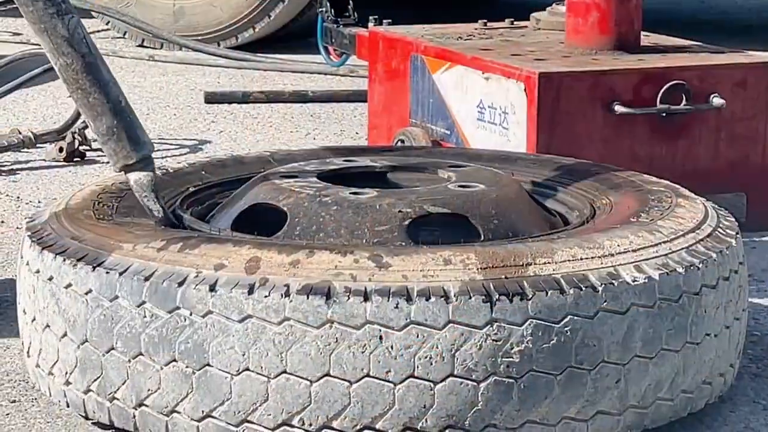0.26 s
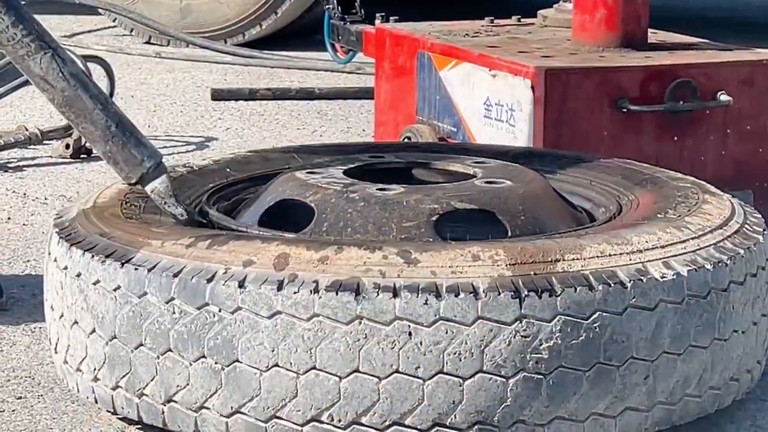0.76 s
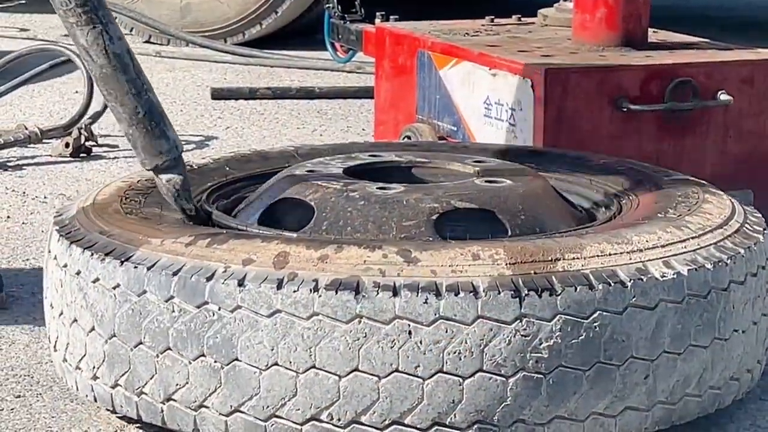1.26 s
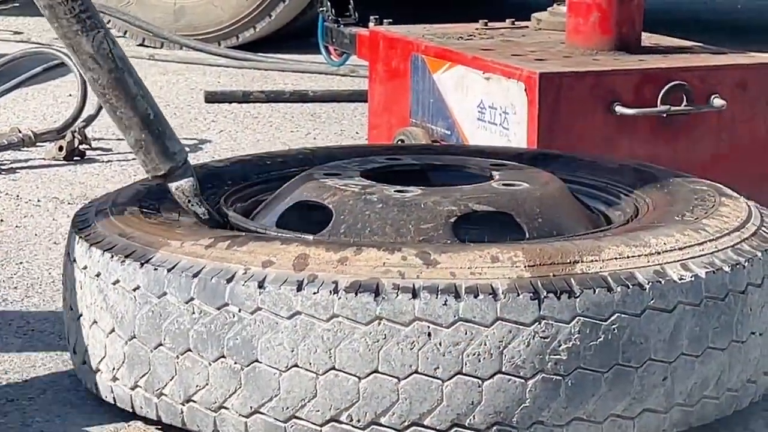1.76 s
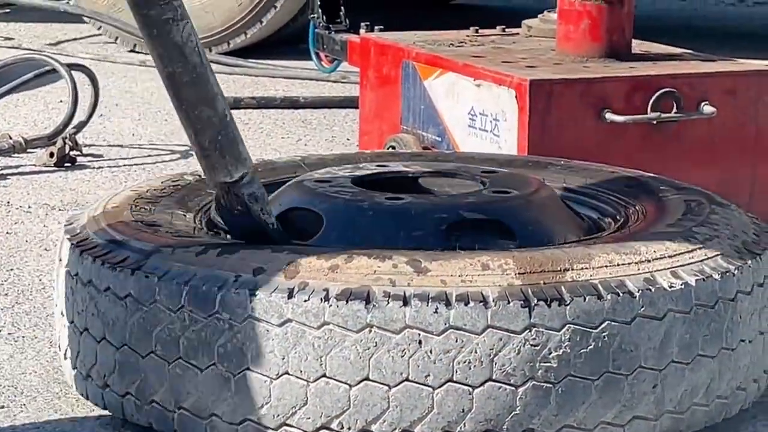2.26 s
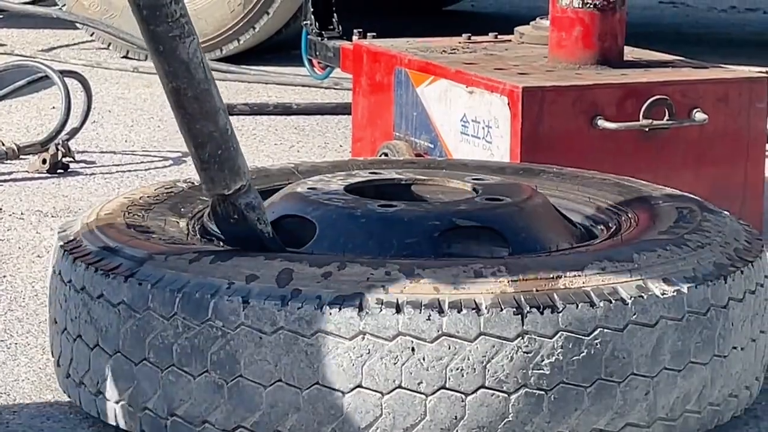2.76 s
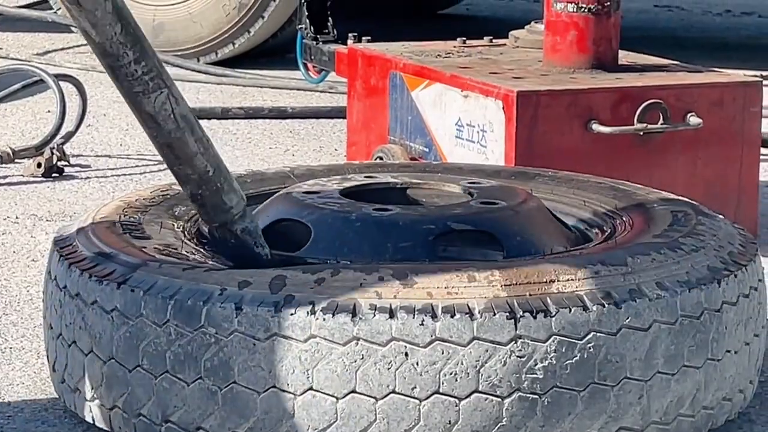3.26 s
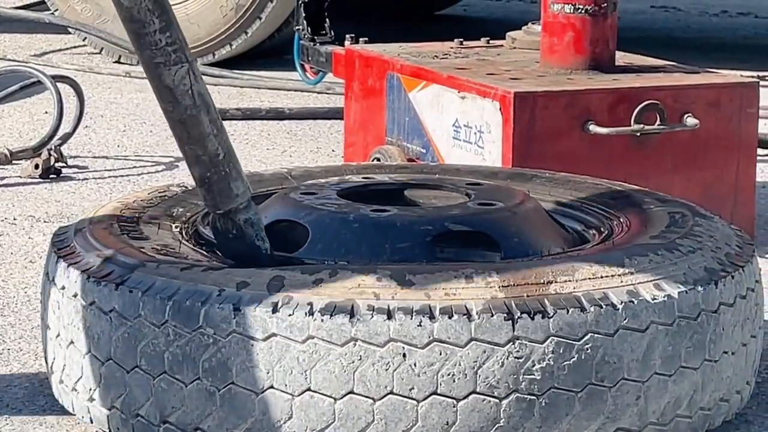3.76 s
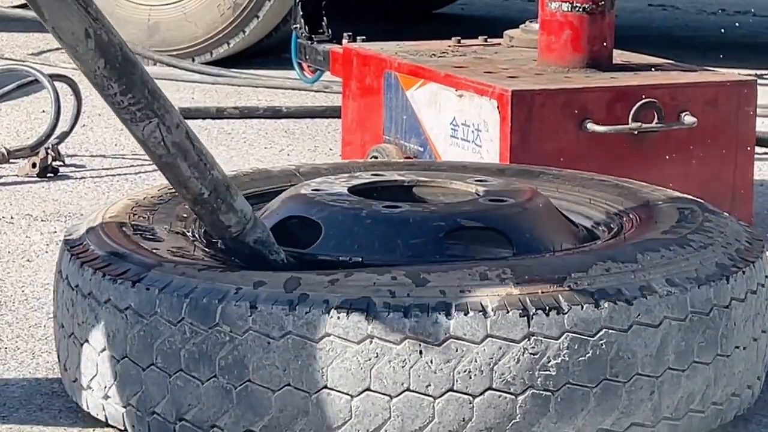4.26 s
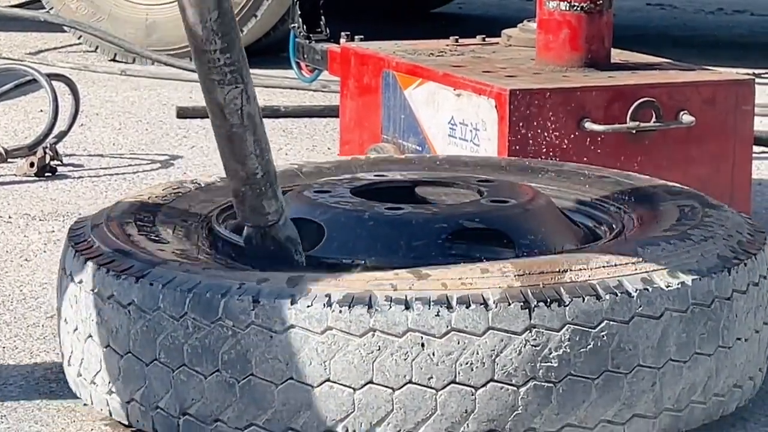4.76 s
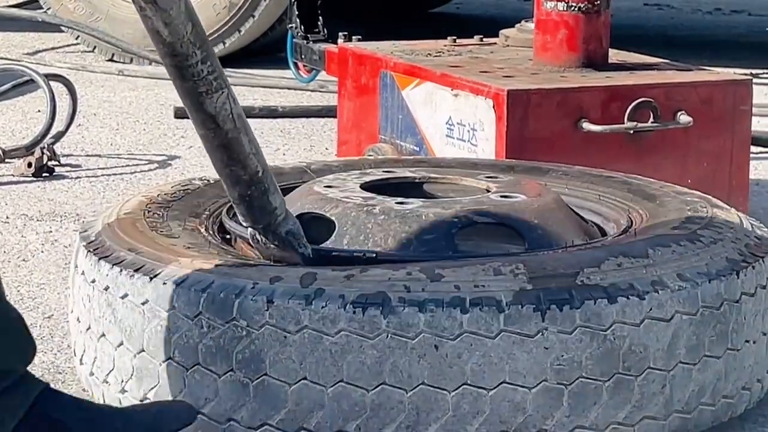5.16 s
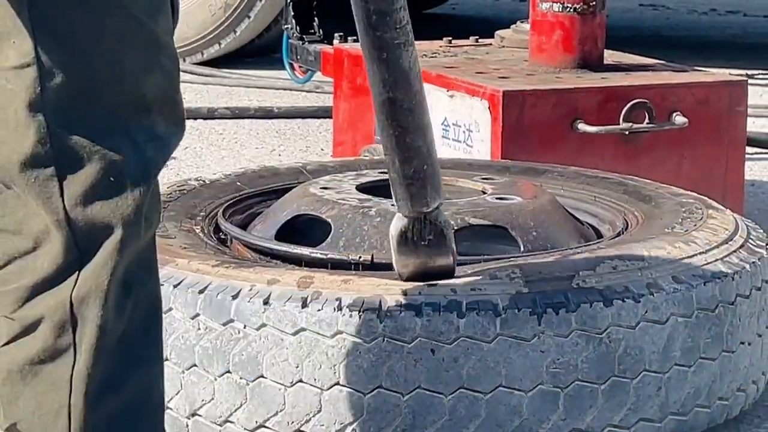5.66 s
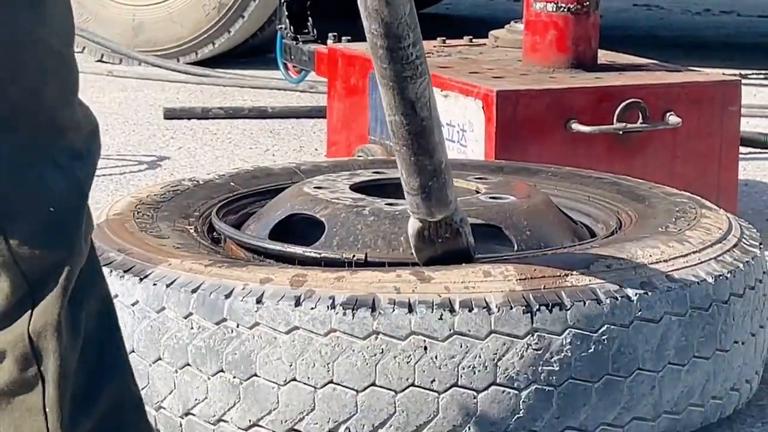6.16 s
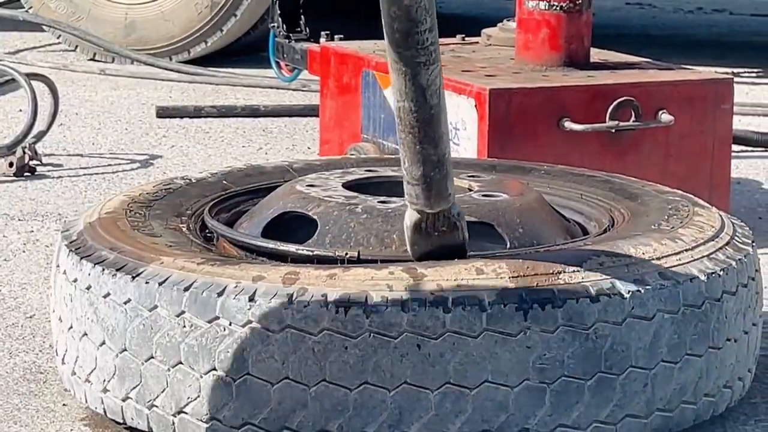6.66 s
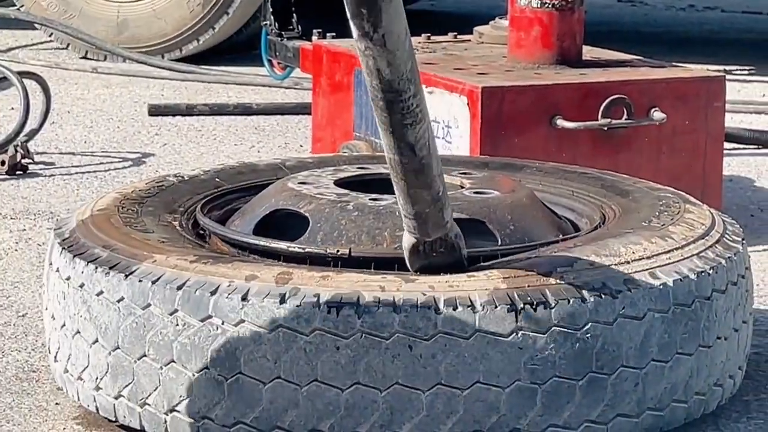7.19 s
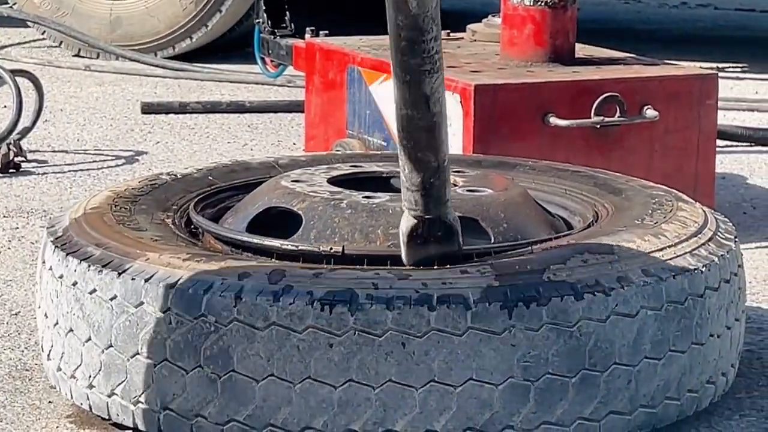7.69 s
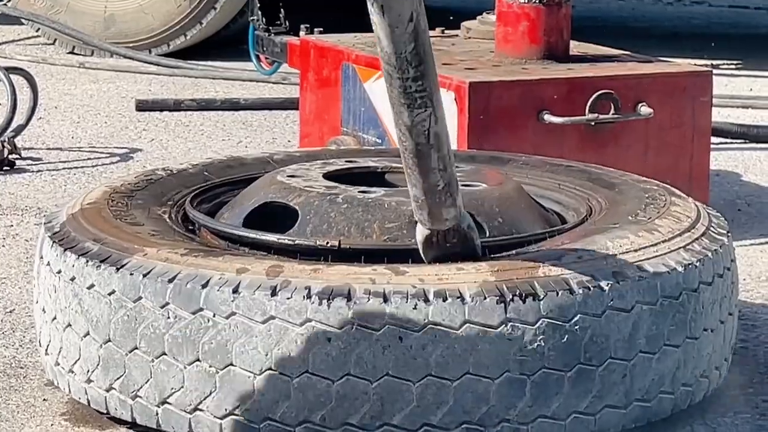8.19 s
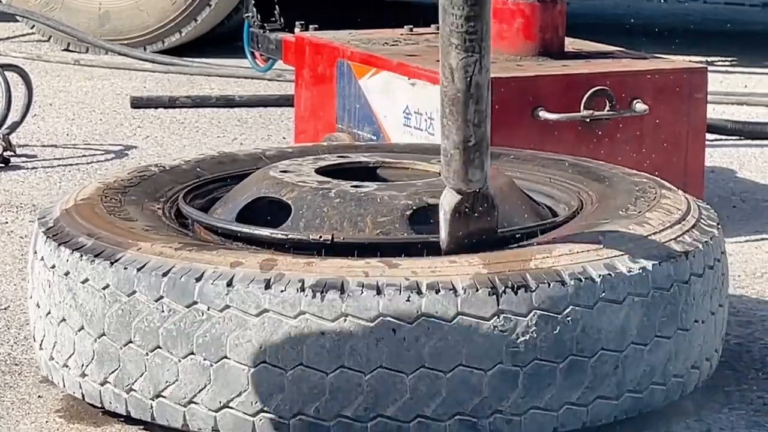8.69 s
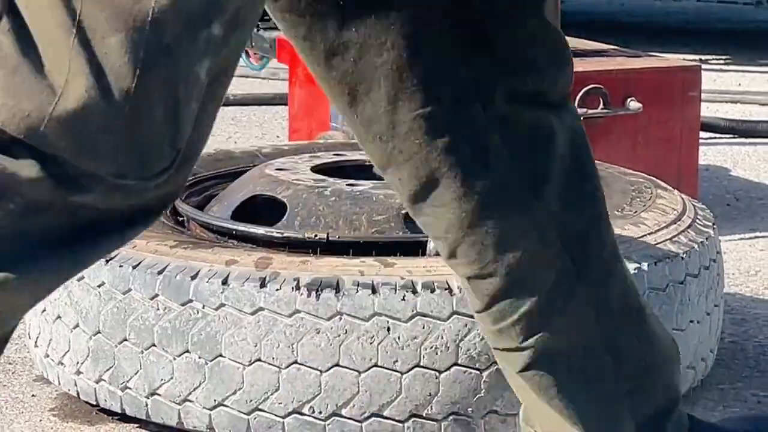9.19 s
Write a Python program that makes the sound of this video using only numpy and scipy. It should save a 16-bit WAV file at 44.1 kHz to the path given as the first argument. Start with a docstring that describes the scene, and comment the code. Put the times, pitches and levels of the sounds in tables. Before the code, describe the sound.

Wind puffs and steel rattling open the scene, then a slow series of slams follows about every second, steel on steel with a dull tyre thump underneath. Between blows the sleeve scrapes along the bar, ticking, with one short breathy rising squeak late on. Dry, open yard, close phone microphone, narrow stereo, faint hiss; a quieter blow comes midway.

```python
"""An open lot, close to a lorry wheel: a steel sleeve slides on a long bar wedged between tyre and rim.
It scrapes, rattles and slams down: shaped noise, directly and through damped modes of the steel.
Bar and wheel disc sing after single ticks; the tyre thuds from short pushes and a falling rim note.
Wind on the phone's two microphone ports is band noise, random pops and single puffs; the rising
sleeve squeaks with gliding partials, and a faint hiss lies behind it all."""
import sys
import numpy as np
from scipy import signal
from scipy.fft import rfft, irfft
from scipy.io import wavfile
from scipy.ndimage import uniform_filter1d

SR = 44100
rng = np.random.default_rng(int(sys.argv[2]) if len(sys.argv) > 2 else 0)


def waveform_to_disk(signal):
    """Save audio, clipped to [-1, 1], as 16-bit WAV at the path in sys.argv[1]."""
    frames = np.transpose(np.atleast_2d(signal))
    scaled = np.clip(frames, -1, 1) * 32767
    samples = np.round(scaled).astype(np.int16)
    wavfile.write(sys.argv[1], SR, samples)


N = 415863

# Full blows of the sleeve, driving the bar into the tyre bead. Each row: start in seconds, blow level in dB,
# tyre air in dB over the blow, settled note of the rim seat in Hz, rub level of the rebound in dB.
BLOWS = [(0.391, -20, 15.5, 290, -46.5), (1.222, -11, 5, 332, -36.5), (2.852, -11, -14, 595, -49),
         (3.859, -9, 3, 339, -38.5), (4.7, -5.5, 1.5, 356.4, -32), (5.966, -17.5, -10, 813, -59),
         (6.687, -24.5, 9, 300, -47.5), (6.822, -5, -1, 330, -42), (7.686, -23.5, -0.5, 1014, -44),
         (7.713, -10, 2, 337, -36.5), (8.552, -7.5, -3, 481, -35)]
# Ringing notes of the long bar. Each row: pitch in Hz, relative drive in dB, 60 dB decay time in seconds.
BAR_MODES = [(2992, 0, .45), (5495, 0, .25), (8190, 0, .45)]


def undb(db):
    """Amplitude factor of a level in dB."""
    return 10 ** (np.asarray(db) / 20)


def unit(x):
    """The signal scaled to an RMS of 1."""
    return x / np.sqrt(np.mean(x ** 2))


def curve(table):
    """Columns of a table in seconds, joined by straight lines over the whole scene."""
    s, *columns = np.transpose(table)
    return [np.interp(np.arange(N) / SR, s, column) for column in columns]


def on_hz(table):
    """A (Hz, value) table read at every FFT bin, on a logarithmic pitch scale."""
    hz, value = np.transpose(table)
    bins_hz = np.fft.rfftfreq(N + 1, 1 / SR)
    return np.interp(np.log(bins_hz + 1), np.log(hz), value)


def colour(x, gain):
    """Filter by a gain, real or complex, for every FFT bin."""
    return irfft(rfft(x, N + 1) * gain, N + 1)[..., :N]


def band(x, lo_hz, hi_hz, order=2):
    """Keep the band between two pitches."""
    edges_hz = [lo_hz, min(hi_hz, .45 * SR)]
    return signal.sosfilt(signal.butter(order, edges_hz, "band", fs=SR, output="sos"), x)


def walk(rate):
    """Random drift in straight lines between levels 1 / rate seconds apart; spread about 0.8."""
    k = int(SR / rate)
    levels = rng.standard_normal(N // k + 1)
    return 0.98 * uniform_filter1d(np.repeat(levels, k), k)[:N]


def add(track, s, shape):
    """Lay a short shape into a track at s seconds."""
    i = int(s * SR)
    track[i:i + len(shape)] += shape[:N - i]


def ring(force, modes, wander_db=0):
    """Damped modes; as the contact point moves, each mode is driven more or less."""
    out = 0
    for hz, db, t60 in modes:
        radius = np.exp(-np.log(1000) / (max(t60, .01) * SR))
        w = 2 * np.pi * hz / SR
        drive = force * undb(db + wander_db * walk(9))
        out = out + signal.lfilter([np.sin(w)], [1, -2 * radius * np.cos(w), radius ** 2], drive)
    return out


def grit(rate, spread_db):
    """Noise in uneven grains: a contact that chatters."""
    return unit(rng.standard_normal(N) * undb(spread_db * walk(rate)))


def lot():
    """Faint steady hiss of the open yard."""
    return undb(-73.5) * unit(band(rng.standard_normal(N), 300, 2700, order=1))


def pops():
    """Sharp eddies at random moments, a few much stronger, their level drifting in loose clusters."""
    pops_per_s, spread_db = 500, 3.2
    when, size, sign = rng.random((int(pops_per_s * N / SR), 3)).T
    out = np.zeros(N)
    out[(when * N).astype(int)] = np.sign(sign - .5) * undb(-spread_db * np.log(1 - size))
    return out * undb(2 * walk(13))


def wind():
    """Eddies at the ports: a lumpy rumble, and a flutter of short pops that reaches higher as it strengthens."""
    # Strength of the wind. Each row: time in seconds, rumble in dB, flutter in dB.
    gusts = [(0, -37.5, -25.5), (.3, -30, -27), (.44, -36.5, -37.5), (.74, -43, -31), (1.0, -51, -52),
             (1.4, -41, -50), (2.1, -49, -46.5), (2.4, -46, -38), (2.7, -43.5, -38.5), (2.9, -47.5, -49.5),
             (3.5, -48.5, -49.5), (3.86, -47, -55), (4.05, -41, -55.5), (4.78, -39, -49), (5.2, -40, -61),
             (5.45, -54.5, -64.5), (5.83, -47.5, -58), (6.1, -56, -63.5), (6.46, -43.5, -47.5),
             (7.14, -42, -54.5), (7.7, -41.5, -41), (8.3, -48, -60), (8.5, -37.5, -44), (8.85, -40.5, -52),
             (9.03, -49, -82), (9.25, -38.5, -67.5)]
    rumble_db, flutter_db = curve(gusts)
    rumble = 0
    # low edge Hz, high edge Hz, level dB, lumps per second
    for lo_hz, hi_hz, db, rate in [(45, 93.6, -1.5, 16), (82, 187, -3.5, 12), (160, 286, -8.5, 55)]:
        noise = unit(band(rng.standard_normal(N), lo_hz, hi_hz))
        rumble = rumble + undb(db + 4.5 * walk(rate)) * noise
    eddies = pops()
    low = unit(band(eddies, 150, 800, order=3))
    high = unit(band(eddies, 650, 1000, order=3))
    reach = undb(np.clip(0.8 * (flutter_db + 20.5), -18, 0))
    return undb(rumble_db) * rumble + undb(flutter_db) * (low + reach * high)


def puffs():
    """Each puff on the ports is a quick swell of lumpy noise around its own pitch."""
    # Single puffs. Each row: start in seconds, relative level in dB, centre in Hz.
    puff_rows = [(0.064, -17, 158), (0.115, -10, 760), (0.18, -20, 880), (0.209, -13.5, 890),
                 (0.27, -14.5, 750), (0.607, -16.5, 172), (0.705, -12.5, 198), (0.791, -29, 940),
                 (0.915, -22.5, 754), (1.622, -25, 200), (1.671, -21, 259), (1.75, -34.5, 600),
                 (2.026, -22.5, 218), (2.404, -15.5, 174), (2.602, -25, 215), (2.668, -19, 610),
                 (2.707, -21, 650), (3.116, -30, 408), (3.25, -33.5, 284), (3.345, -27, 183),
                 (5.324, -21, 208), (5.708, -25, 161), (6.486, -21.5, 153), (7.242, -24.5, 148),
                 (7.336, -16.5, 146), (7.395, -18, 164), (7.522, -16, 165), (8.422, -17.5, 237),
                 (8.444, -29, 397), (9.269, -17.5, 193.5)]
    out = np.zeros(N)
    t = np.arange(SR // 10) / SR
    swell = t / 0.0062 * np.exp(1 - t / 0.0072)
    noise = rng.standard_normal((len(puff_rows), len(t)))
    for (s, db, hz), air in zip(puff_rows, noise):
        lumps = unit(band(air, .45 * hz, 1.6 * hz, order=3))
        add(out, s, undb(db - 12.0) * swell * lumps)
    return out


def squeak():
    """A breathy note that rises as the air column in the lifting sleeve shortens."""
    # Glide of the note. Each row: time in seconds, pitch in Hz, level in dB before the partials' own levels.
    glide = [(7.09, 683, -51), (7.196, 727, -49), (7.3, 888, -50)]
    hz, db = curve(glide)
    t = np.arange(N) / SR
    on = np.clip(np.minimum(t - glide[0][0], glide[-1][0] - t) / 0.0067, 0, 1)
    turns = np.cumsum(hz) / SR
    notes = 0
    # pitch ratio, relative dB; a fast random drift makes each partial breathy
    for ratio, share_db in [(1, 3), (1.45, 0), (1.75, 2), (2.2, -4)]:
        notes = notes + undb(share_db) * walk(90) * np.sin(2 * np.pi * ratio * turns)
    return on * undb(db) * notes


def tyre():
    """A short push shakes the carcass and the rim seat at once; the air inside builds up its note a little later."""
    # Modes of the carcass. Each row: pitch in Hz, relative drive in dB, 60 dB decay time in seconds.
    carcass = [(80, -11.5, 0.24), (367.3, -5, 0.05), (500, 0, 0.018), (680, -6.5, 0.052), (965, -9.5, 0.15)]
    # Modes of the air in the tyre. Each row: pitch in Hz, relative drive in dB, 60 dB decay time in seconds.
    tyre_air = [(180, -7, 0.1), (230, -2, .12), (274, -2, 0.019)]
    air_lag_s = .013
    push, squeeze, seat = np.zeros((3, N))
    t = np.arange(SR // 20) / SR
    for s, db, air_db, hz, _ in BLOWS:
        add(push, s, undb(db) * unit(np.hanning(int(0.00092 * SR))))
        add(squeeze, s + air_lag_s, undb(db + air_db) * np.hanning(int(0.0019 * SR)))
        # the note drops as the stretched bead slackens
        turns = hz * (t + .003 * (1 - np.exp(-t / .004)))
        add(seat, s, undb(db - 60 * t / 0.12) * np.sin(2 * np.pi * turns))
    thud = undb(-34.5) * ring(push, carcass)
    air = undb(-34.5) * ring(squeeze, tyre_air)
    return thud + air + undb(-7.5) * seat


def singing():
    """Thin notes of the free bar and of the thick wheel disc, each set off by one tick."""
    # The bar swings free and sings. Each row: start in seconds, then drive in dB of its lowest, second
    # and third note.
    free_bar = [(.0094, -41.5, -48, -52.5), (0.421, -34, -42, -31), (0.7764, -44, -66, -48),
                (1.1278, -29, -61, -47), (1.2407, -23, -36, -31), (1.3194, -52, -38, -46),
                (2.219, -47.5, -54, -51.5), (2.991, -33, -33, -45.5), (3.7958, -29.5, -40, -53),
                (4.723, -26, -33, -29.5), (4.9495, -36.5, -49, -63), (6.9614, -39.5, -45, -44.5),
                (7.7295, -26.5, -41, -34.5), (7.85, -41.5, -62, -38), (8.5561, -28, -29, -26),
                (8.79, -38, -62, -45.5)]
    # Light touches that set the wheel disc singing. Each row: start in seconds, drive in dB.
    touches = [(0.0094, -42), (0.7715, -45.5), (1.049, -52.5), (7.236, -50.5), (7.3256, -36),
               (8.075, -56.5), (8.209, -59)]
    # Notes of the disc. Each row: pitch in Hz, relative drive in dB, 60 dB decay time in seconds.
    disc = [(2460, 0, .5), (4400, -7, .4)]
    bar_ticks = np.zeros((len(BAR_MODES), N))
    disc_ticks = np.zeros(N)
    for s, *notes_db in free_bar:
        for track, db in zip(bar_ticks, notes_db):
            add(track, s, undb([db]))
    for s, db in touches:
        add(disc_ticks, s, undb([db]))
    bar = sum(ring(track, [mode]) for track, mode in zip(bar_ticks, BAR_MODES))
    return bar + ring(disc_ticks, disc)


def slide_db():
    """The slow drag of the hands, and after every slam a rebound that swells, holds and dies."""
    # Sleeve rubbing on the bar. Each row: time in seconds, rub level in dB.
    drag = [(0, -36.5), (.12, -65), (.3, -51), (.85, -52), (1.1, -60.5), (1.7, -73.5), (2.38, -67),
            (2.56, -52.5), (2.7, -69.5), (2.82, -51.5), (3.4, -54.5), (3.65, -62), (4.15, -49.5),
            (4.49, -59), (4.62, -37.5), (5.0, -61), (5.36, -81), (5.75, -61.5), (6.05, -75), (6.4, -54),
            (6.66, -63), (6.81, -32), (7.1, -49), (7.5, -55.5), (8.0, -49), (8.4, -72), (8.75, -49),
            (9.0, -70), (9.43, -91)]
    rise_s, hold_s, fall_db_per_s = 0.03, 0.037, 115.5
    t = np.arange(N) / SR
    power = undb(2 * curve(drag)[0])
    for s, *_, rebound_db in BLOWS:
        fade_db = fall_db_per_s * np.maximum(t - s - rise_s - hold_s, 0)
        rebound = np.clip((t - s) / rise_s, 0, 1) * undb(rebound_db - fade_db)
        power = power + rebound ** 2
    return 10 * np.log10(power)


def loose_ticks(rub_db):
    """Small knocks at random moments, their level following the rub."""
    ticks_per_s, over_rub_db, spread_db = 30, 8.5, 1.8
    fall_db = 6  # per 10 ms
    when, size = rng.random((int(ticks_per_s * N / SR), 2)).T
    db = rub_db[(when * N).astype(int)] + over_rub_db - spread_db * np.log(1 - size)
    return [(s, d, fall_db) for s, d in zip(when * N / SR, db)]


def thicket(x):
    """Countless small modes too close to tell apart; the set that sounds shifts with the contact point."""
    t60_s = .05
    t = np.arange(SR // 10) / SR
    place = np.pi * walk(8)
    out = 0
    for share in (np.cos(place), np.sin(place)):
        modes = unit(rng.standard_normal(len(t)) * undb(-60 * t / t60_s)) / np.sqrt(len(t))
        out = out + signal.fftconvolve(x * share, modes)[:N]
    return out


def steel():
    """Every knock is a dying burst of chatter, heard directly and through the modes; the slide rubs the same steel."""
    # Steel on steel. Each row: start in seconds, knock level in dB before mixing, fall of the rattle in dB
    # per 10 ms (raised to at least 1.8 below).
    knock_rows = [(.2297, -25, -1.5), (.3037, -17.5, 3.5), (.3358, -19.5, -1), (.3607, -8, 4),
                  (.374, -5.5, 4), (.3918, -9.5, 2), (.5071, -36, 6), (.5448, -22, 2), (.7417, -28.5, 2.5),
                  (.7656, -23.5, 12.5), (1.048, -37, 0.5), (1.1318, -21, 3.5), (1.1939, -16, 10),
                  (1.207, -2, 4.5), (1.2232, -2, 4), (1.3113, -44, -1), (1.3741, -25, 1.5),
                  (1.479, -21, 5.5), (1.4916, -26.5, 5.5), (1.877, -35.5, 2.5), (1.9444, -27.5, 15),
                  (1.9995, -34.5, 2.5), (2.0788, -29.5, 14), (2.2193, -10.5, 5), (2.2813, -19.5, 4.5),
                  (2.8512, 3.5, 8.5), (2.8733, -5, 2.5), (2.9181, -9.5, 5.5), (2.9411, -2.5, 9.5),
                  (2.9731, -21, 5.5), (3.1996, -41, 14), (3.3483, -32.5, -0.5), (3.512, -34, 3.5),
                  (3.7556, -15, 1.5), (3.7658, -15.5, 5.5), (3.8387, -5.5, 4.5), (3.8596, -0.5, 8.5),
                  (3.8851, -6, 3), (3.9189, -15, 4.5), (3.986, -16.5, 13), (4.0036, -23.5, 7),
                  (4.4054, -33, 4.5), (4.508, -16.5, 4.5), (4.5773, -29.5, 2), (4.6045, -22, 5.5),
                  (4.6692, -3.5, 3), (4.6972, -3.5, 4), (4.8177, -19.5, 2.5), (4.8425, -21, 12),
                  (4.8934, -17.5, 4.5), (4.93, -21, 4), (5.244, -40.5, 9), (5.299, -43.5, 2.5),
                  (5.4176, -47, 10.5), (5.581, -29.5, 5.5), (5.595, -21, 4.5), (5.659, -37.5, 5.5),
                  (5.767, -23.5, 21.5), (5.8376, -25, 16), (5.932, -12.5, 9), (5.9683, -10, 5.5),
                  (5.979, -23, 5), (6.4183, -31.5, 4), (6.7957, -16, 4.5), (6.823, 0.5, 8.5),
                  (6.8454, -4, 2.5), (6.8872, -14, 5), (6.9567, -18.5, 6), (7.325, -22, 5),
                  (7.3508, -26, -0.5), (7.3945, -24.5, 17), (7.5599, -23, -1), (7.596, -6.5, 6.5),
                  (7.6222, -8.5, 4), (7.6871, -1.5, 13), (7.6967, -3, 1), (7.7114, -6.5, 6),
                  (7.8466, -31.5, 3), (8.3978, -35, -2), (8.4552, -25.5, -4.5), (8.4907, -17.5, 4.6),
                  (8.523, -3.5, 2.5), (8.552, -2.5, 12), (8.5734, -13, 2), (8.7, -8, 9.5),
                  (8.754, -22.5, 3.5), (8.784, -25.5, 14), (8.88, -40, 6), (9.1745, -47.5, 3.5),
                  (9.2458, -39.5, 7.5), (9.3842, -51, 9)]
    # Rim and sleeve, damped by rubber and hands. Each row: pitch in Hz, relative drive in dB,
    # 60 dB decay time in seconds.
    steel_modes = [(895, -15, .06), (1660, -9, .12), (1692, -4, .2), (1725, -6, .14), (1770, -9, .1),
                   (1830, -11, .07), (2060, -11, .05), (2170, -10, .07), (2963, -4, .14), (3100, -6, .1),
                   (3260, -6, .09), (3420, -8, .07), (3520, -5, .08), (3835, -5, .08), (4190, -9, .09),
                   (4270, -10, .08), (4750, -10, .09), (5017, -11, .1), (5150, -14, .08), (6290, -15, .08),
                   (6780, -17, .07), (7560, -20, .08)]
    # Tone of the bare contact noise. Each row: frequency in Hz, gain in dB.
    contact_tone = [(300, -17), (700, -9.5), (1100, -2.5), (1450, -10), (1750, 4.5), (2100, 0),
                    (2550, -4.5), (3200, 3), (5000, -2.5), (7000, -11.5), (9000, -16)]
    # treble drive at a 0 dB knock, rise per dB of knock (harder is brighter), random scatter
    treble_db, treble_per_db, treble_scatter_db = -15, 0.73, 3.5
    body, treble = np.zeros((2, N))
    steps = np.arange(SR // 2) / (SR / 100)  # time in units of 10 ms
    rub_db = slide_db()
    knocks = knock_rows + loose_ticks(rub_db)
    for (s, db, fall_db), chance in zip(knocks, rng.standard_normal(len(knocks))):
        fall_db = max(fall_db, 1.8)
        # a scuff that dies slowly also starts softly
        burst = undb(db - steps * fall_db) * np.minimum(steps * fall_db / 1.5, 1)
        # the first contact is a short hard crack, stronger for clean blows
        burst = burst + undb(db - 12.0 + 0.46 * fall_db - 180 * steps)
        add(body, s, burst)
        add(treble, s, burst * undb(treble_db + treble_per_db * db + treble_scatter_db * chance))
    chatter = grit(300, 4.53) * undb(1.8 * walk(110))
    rub = grit(60, 2) * undb(rub_db)
    rattle = body * chatter
    clatter = colour(undb(-6) * rattle + rub, undb(on_hz(contact_tone)))
    clatter = clatter + undb(2) * thicket(clatter)
    hiss = band(treble * chatter + undb(-5) * rub, 5200, 13000, order=3)
    rings = ring(undb(-45.5) * rattle + undb(-29) * rub, steel_modes, wander_db=1)
    rubbed_bar = ring(undb(-48.0) * rub, BAR_MODES[:1])
    return clatter + hiss + rings + rubbed_bar


def scene():
    """All sources summed, then spread over the two microphone ports."""
    # Difference between the ports. Each row: frequency in Hz, side share in dB before its random drift.
    side_share = [(40, -19), (125, -11), (250, -13), (700, -8), (1500, 0), (2000, -5), (2500, -13),
                  (7000, -13), (9000, -7)]
    mid = lot() + wind() + puffs() + squeak() + tyre() + singing() + steel()
    # moving air and nearby surfaces shift the phase between the ports, never in the same way for long
    side = walk(43) * colour(mid, 1j * undb(on_hz(side_share)))
    return np.array([mid + side, mid - side])


def record(dry):
    """The two ports part in phase in the high treble; deep bass is lost, peaks are rounded, the top is cut."""
    # Phase between the ports. Each row: frequency in Hz, lead of the left port in radians.
    left_lead = [(7500, 0), (8200, -1.7), (9500, -2.85), (10400, -3.4), (11500, -5.2), (12500, -6),
                 (14000, -6.7), (15500, -8.5)]
    turn = np.exp(.5j * on_hz(left_lead))  # half the lead on each port
    ports = colour(dry, np.array([turn, turn.conj()]))
    ports = signal.sosfilt(signal.butter(2, 40, "high", fs=SR, output="sos"), ports)
    top_hz = 15300
    return signal.sosfilt(signal.ellip(10, .2, 90, top_hz, fs=SR, output="sos"), np.tanh(ports))


dry = scene()
out = record(dry)
waveform_to_disk(out)
```